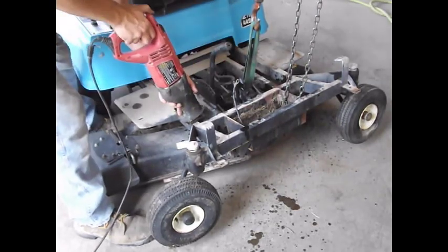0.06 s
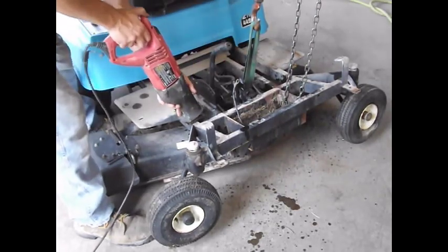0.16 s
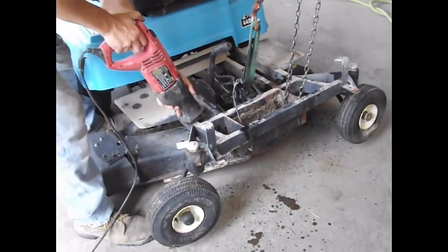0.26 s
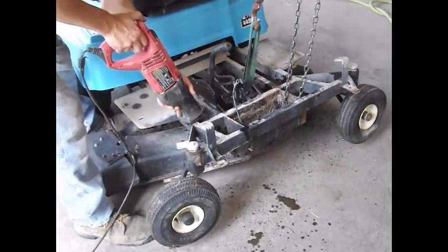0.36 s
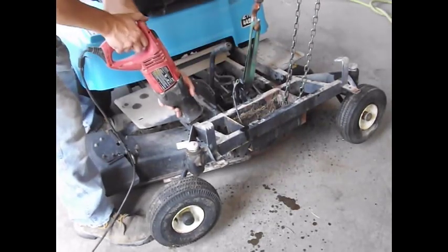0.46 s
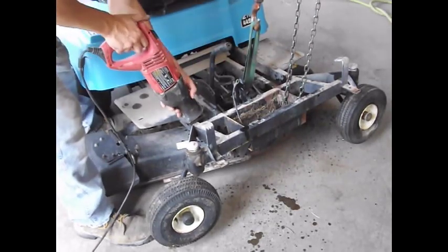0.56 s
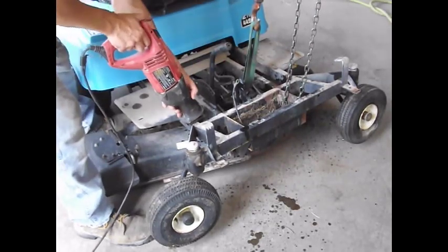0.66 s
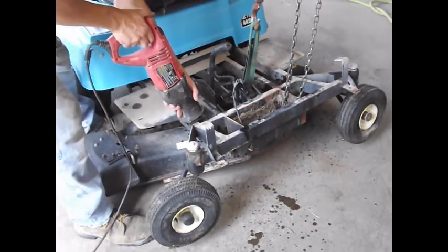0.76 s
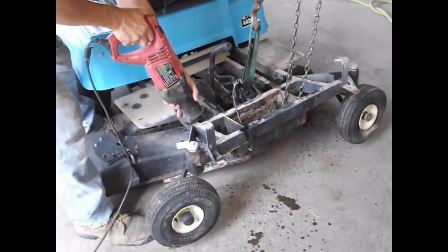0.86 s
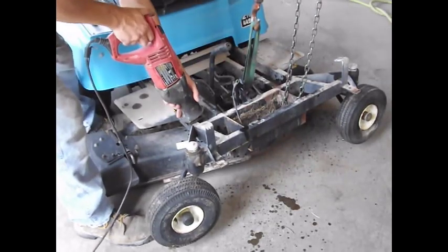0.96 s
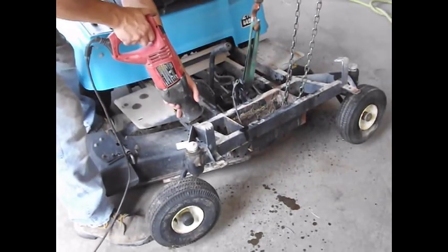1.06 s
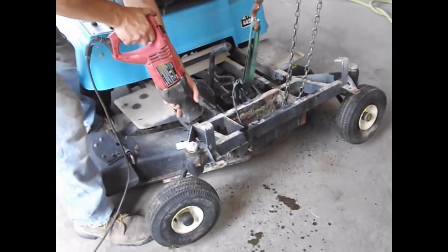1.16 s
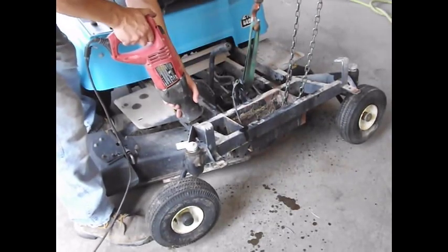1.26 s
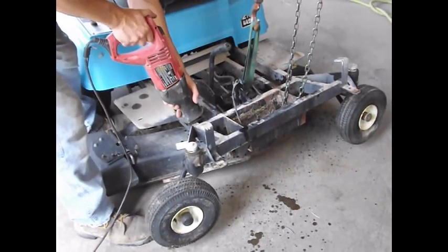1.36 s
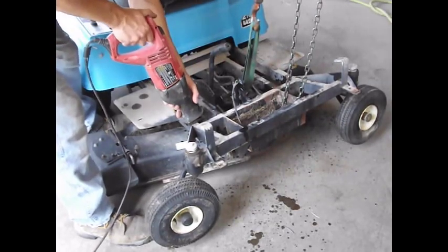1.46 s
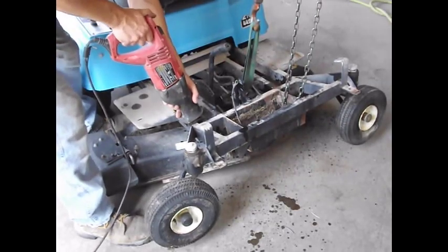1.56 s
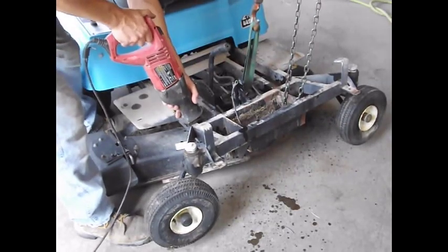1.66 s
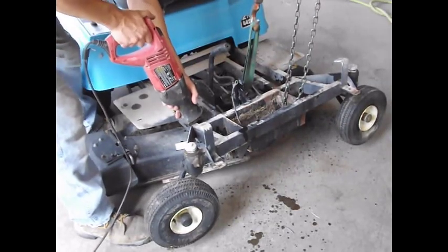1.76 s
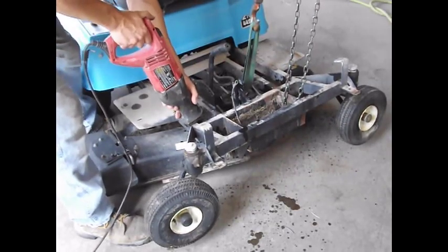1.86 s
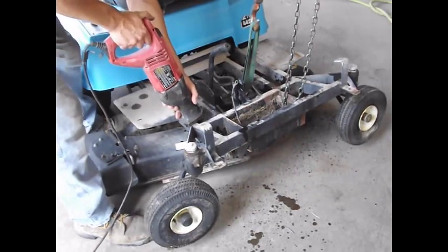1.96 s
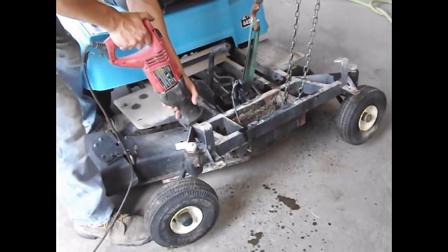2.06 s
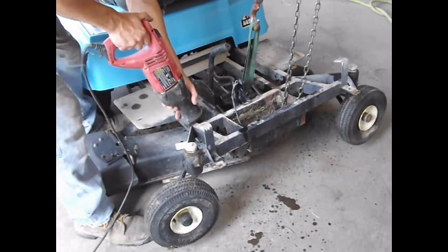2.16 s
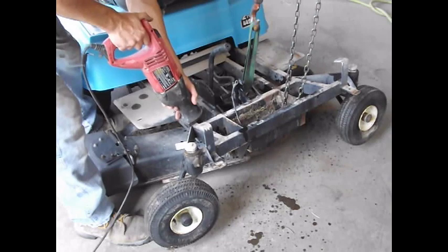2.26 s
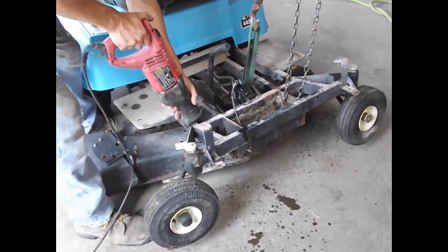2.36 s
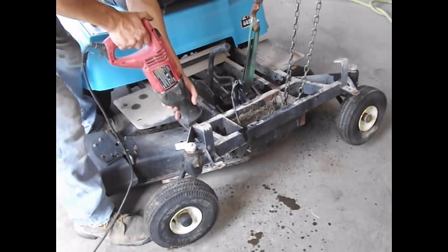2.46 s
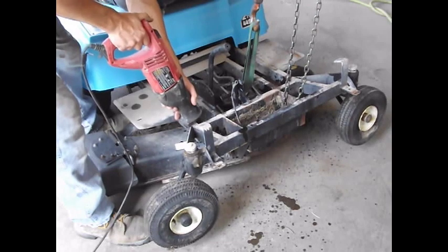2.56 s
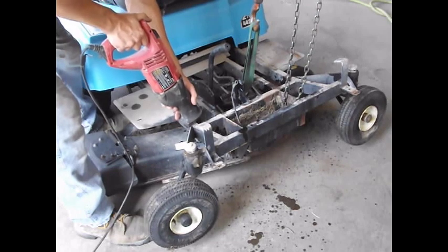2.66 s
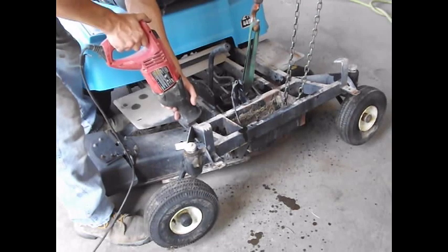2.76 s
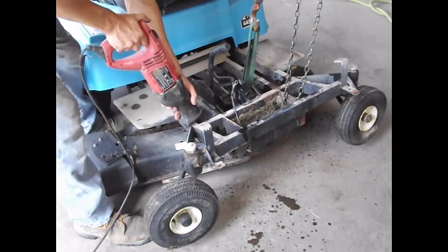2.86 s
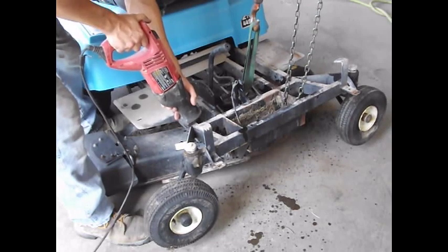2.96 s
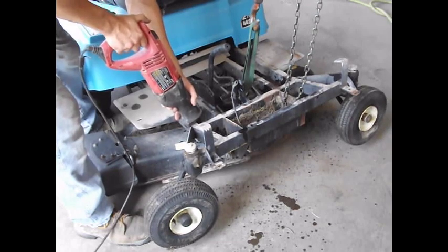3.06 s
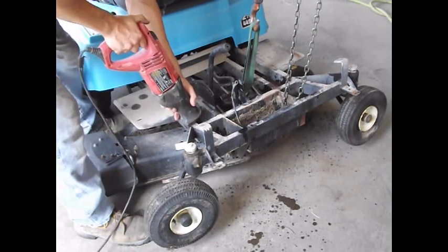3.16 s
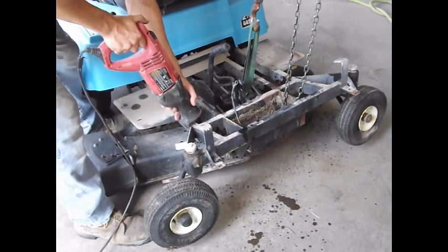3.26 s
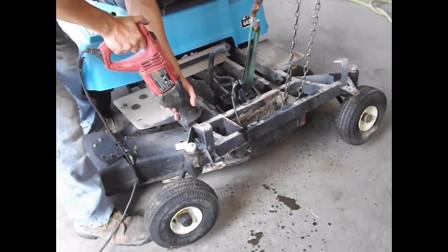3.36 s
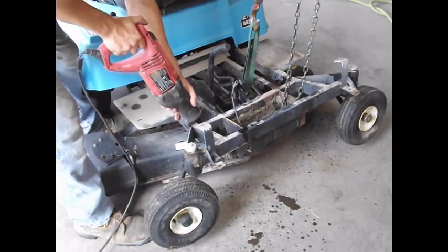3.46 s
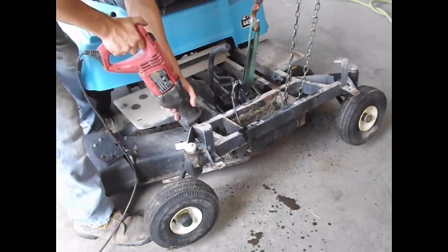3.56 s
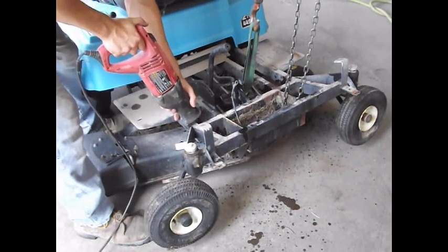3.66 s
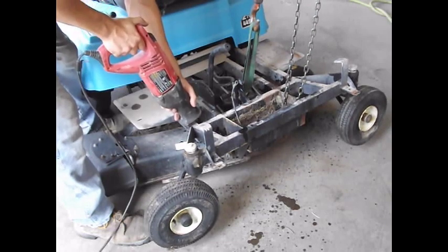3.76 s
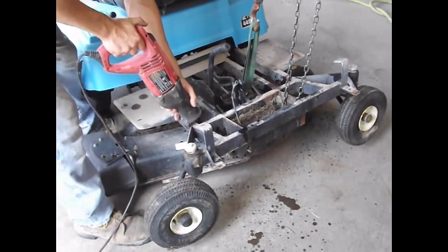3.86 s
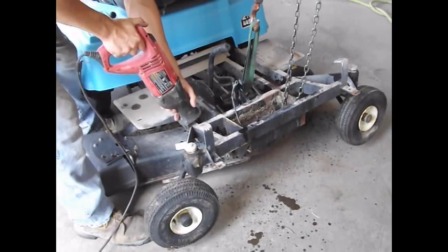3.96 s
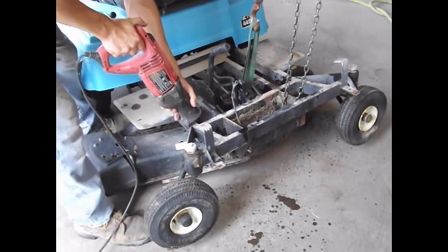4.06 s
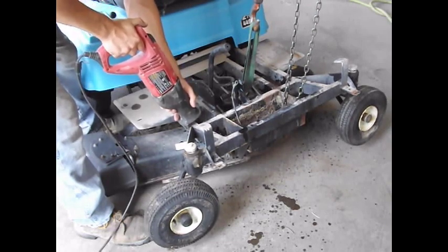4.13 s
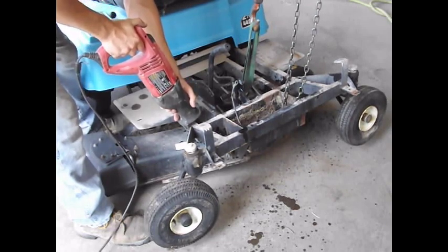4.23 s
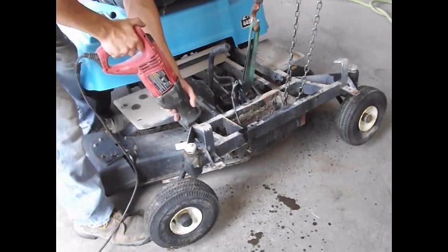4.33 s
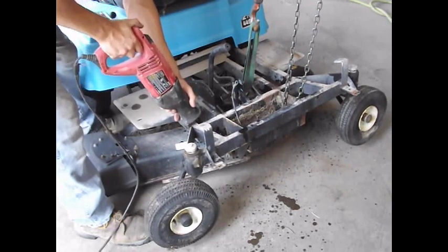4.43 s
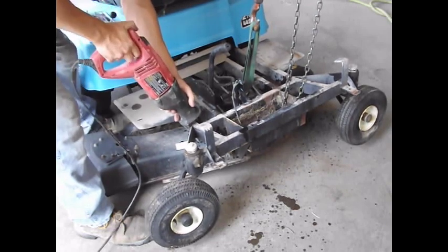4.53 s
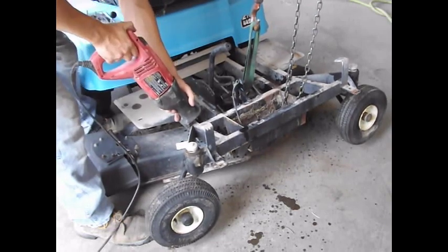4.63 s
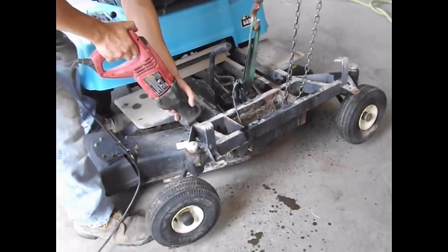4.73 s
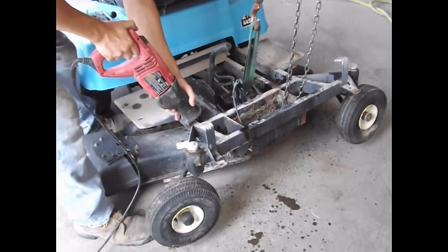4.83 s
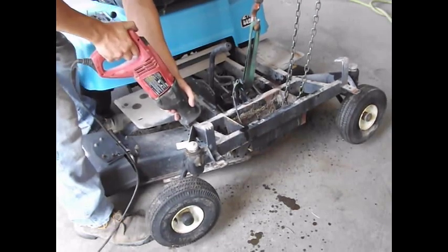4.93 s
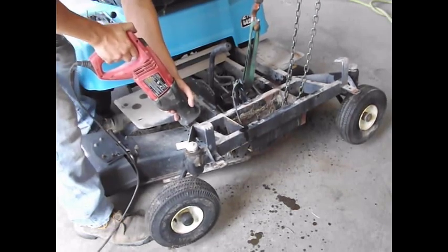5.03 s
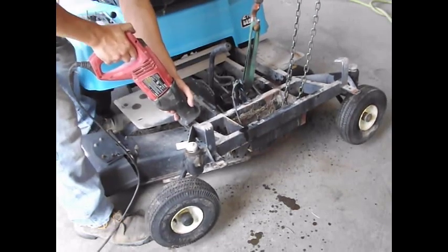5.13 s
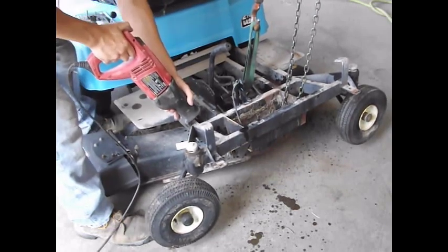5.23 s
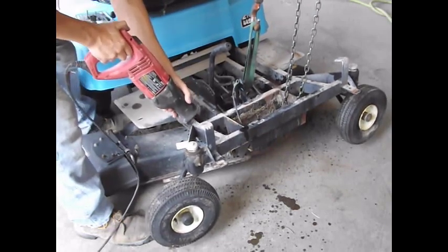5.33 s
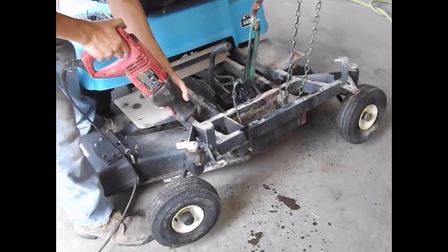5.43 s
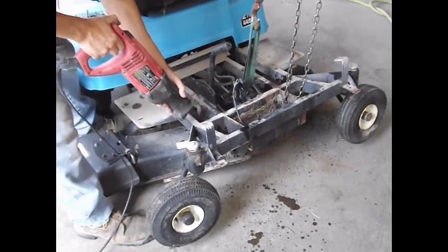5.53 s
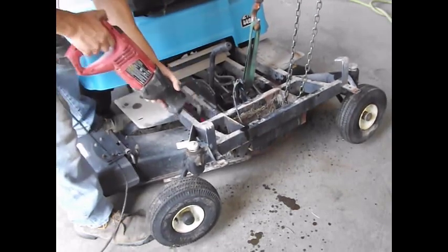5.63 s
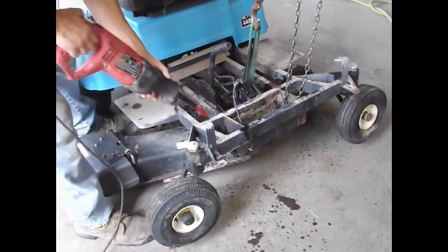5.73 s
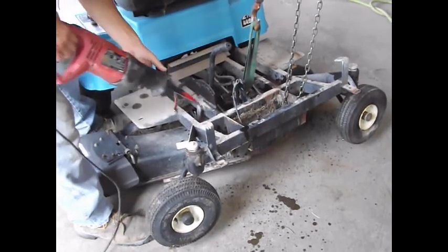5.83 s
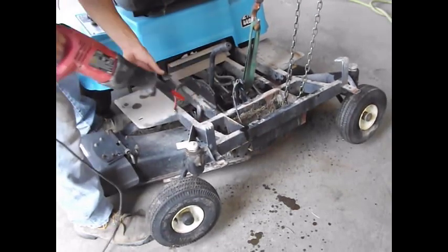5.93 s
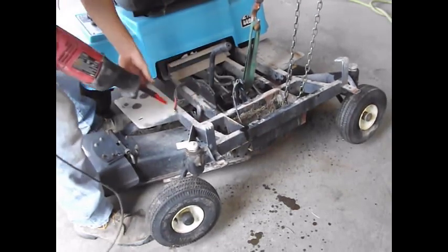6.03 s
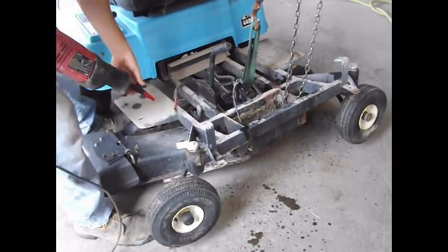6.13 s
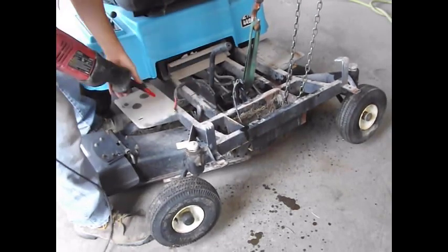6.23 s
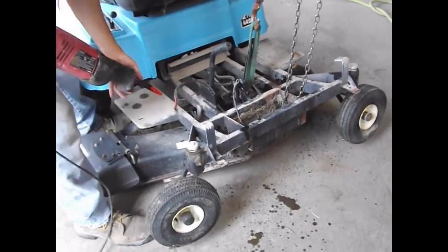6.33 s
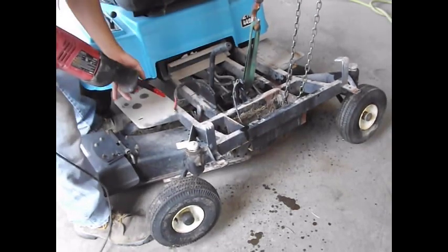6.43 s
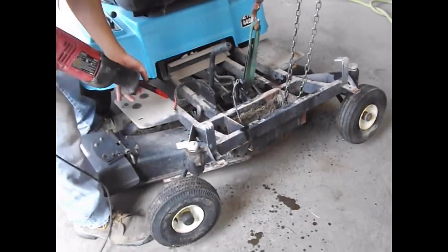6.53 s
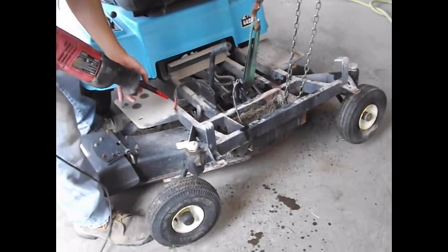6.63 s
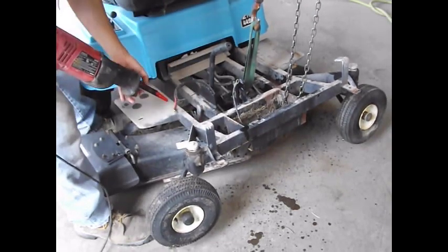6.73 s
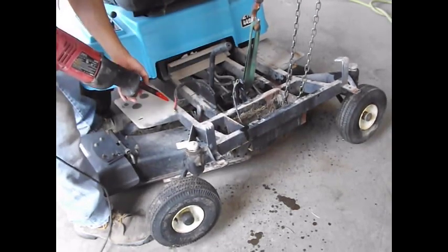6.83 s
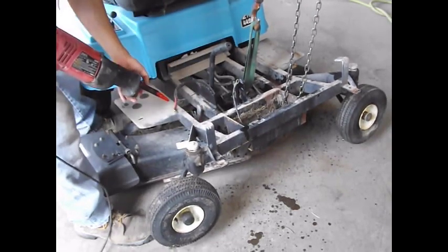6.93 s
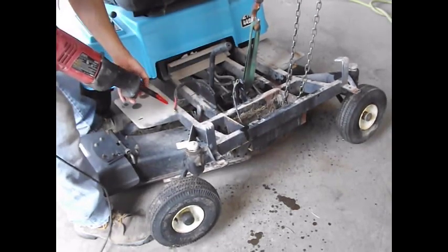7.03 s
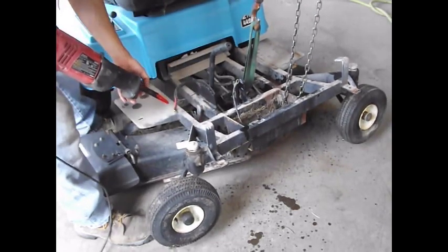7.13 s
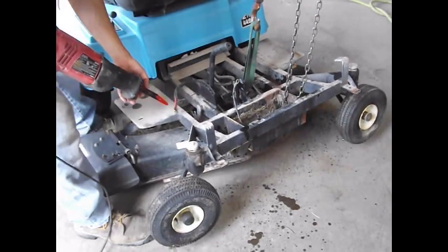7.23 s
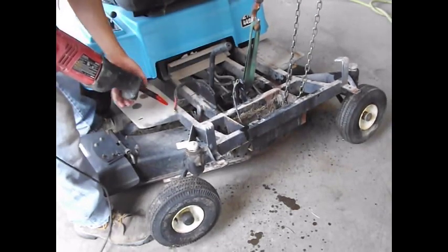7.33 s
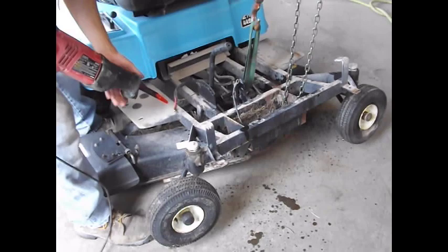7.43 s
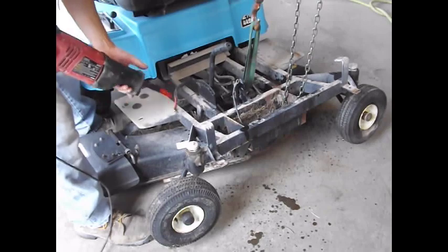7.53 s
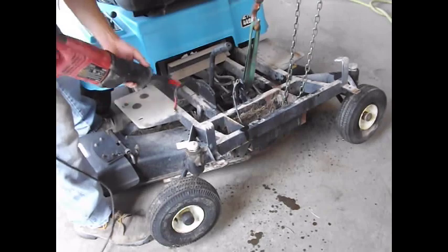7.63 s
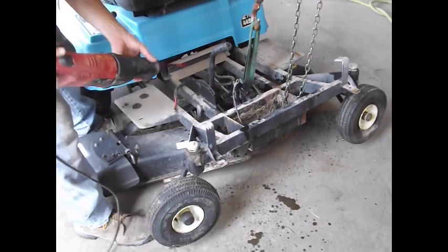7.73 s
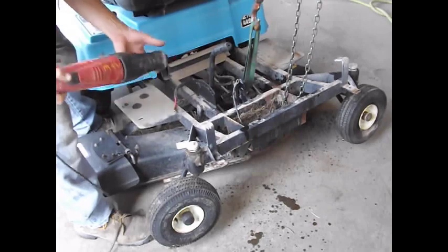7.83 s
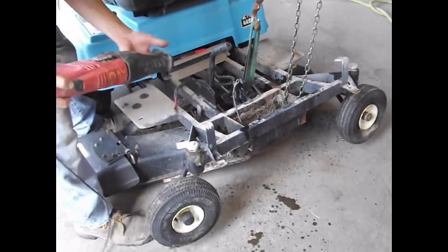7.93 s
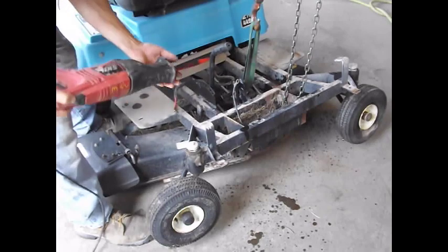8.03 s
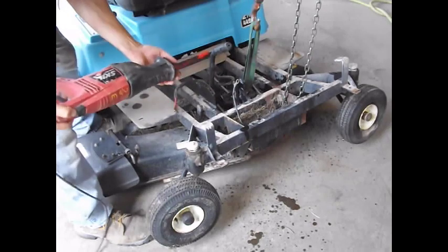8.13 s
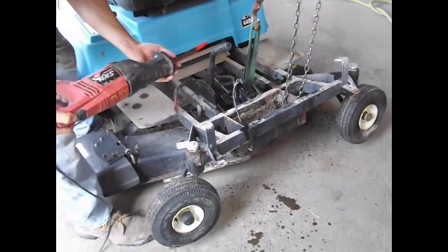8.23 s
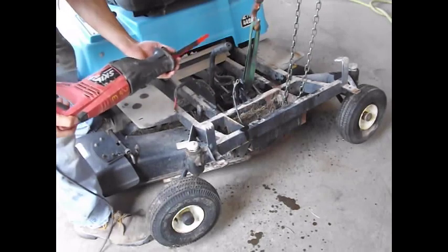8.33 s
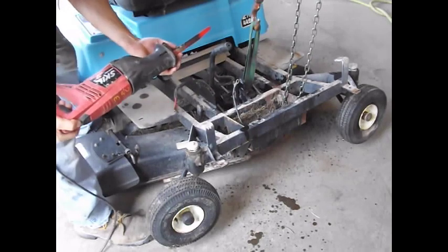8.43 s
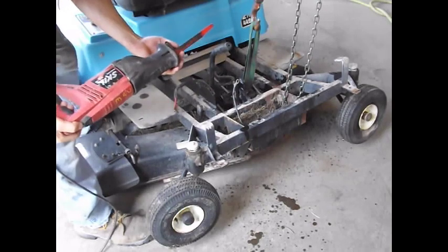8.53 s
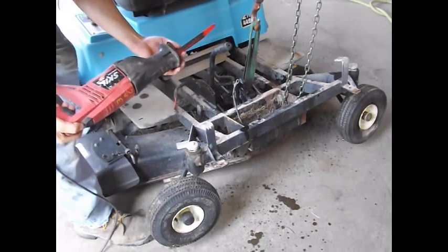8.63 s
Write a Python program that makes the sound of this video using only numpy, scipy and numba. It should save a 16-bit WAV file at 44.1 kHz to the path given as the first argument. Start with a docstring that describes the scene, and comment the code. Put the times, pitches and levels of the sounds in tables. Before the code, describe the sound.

A few soft knocks and a thin rising squeak come before a corded reciprocating saw bites into a steel frame. It revs up fast into loud, rattling, tearing rasp with gear whine and slamming metal, then slows to separate grinding strokes. Scattered knocks, one hard clank and a light blade clink follow. A small camera in a workshop squashes the loudness, over low air rumble and faint hiss.

```python
"""In a workshop, a corded reciprocating saw bites into a steel frame, runs up, cuts for three seconds and coasts down.
Teeth rasp as bursts of tiny impacts on every pass; the blade chatters in its slot and the frame rings in damped modes.
Gears whine at multiples of the blade rate. Knocks, and later clinks of the blade, are heard as the saw is handled.
Rumbling air and soft hiss lie beneath. A small camera with gain control and a low sample rate hears it all."""
import sys
import numpy as np
from scipy import signal
from scipy.fft import rfft, irfft
from scipy.io import wavfile
from scipy.ndimage import uniform_filter1d
from numba import njit

SR = 44100
rng = np.random.default_rng(int(sys.argv[2]) if len(sys.argv) > 2 else 0)


def wav_record(signal):
    """Record a signal, one row per channel, as 16-bit PCM in the file named by sys.argv[1]."""
    frames = np.transpose(np.atleast_2d(signal))
    bounded = np.clip(frames, -1, 1)
    # unit amplitude maps onto the largest positive 16-bit level
    quanta = np.round(bounded * 32767).astype(np.int16)
    wavfile.write(sys.argv[1], SR, quanta)


N = 383229
TIME = np.arange(N) / SR  # [s]

# Spectra and sets of modes give relative levels: each response is scaled to unit energy.
# spectrum of air rumbling on the microphone: (frequency [Hz], level [dB])
RUMBLE_SPECTRUM = [(8, -13), (14, -2), (22, -7), (35, -22), (60, -21), (110, -28.5), (250, -35.5),
                   (600, -72)]
# spectrum of the soft hiss: (frequency [Hz], level [dB])
HISS_SPECTRUM = [(40, -1), (130, 4), (250, 10.5), (500, 6.5), (1000, 3), (1700, 4.5), (2400, 5.5),
                 (3050, 8), (3700, 2.5), (4500, 0.5), (5300, -3.5)]
# strength of the air on the microphone: (time [s], level [dB])
DRAUGHT_LEVEL = [(0.2, -29.5), (1.2, -32.5), (2.0, -35), (4.6, -31.5), (5.1, -14.5), (6.0, -33.5),
                 (7.4, -33.5), (8.69, -30)]
# the loose blade clinking in its clamp: (time [s], strength [dB])
CLINK_BLOWS = [(8.415, 0.5), (8.433, -9), (8.446, -6.5)]
# ring of the free blade: (frequency [Hz], width [Hz], level [dB])
FREE_BLADE_MODES = [(1857, 30, 6), (2480, 200, -2), (2660, 120, -10), (3047, 60, -4), (4000, 120, -3)]
# spectrum of the clamp's tick: (frequency [Hz], level [dB])
CLAMP_SPECTRUM = [(700, -24), (1500, -4.5), (1900, -7), (2600, -2), (3600, -8.5), (4300, -13), (5300, -21)]
# the saw knocking on the chassis: (time [s], strength [dB], thud relative to it [dB], brightness [dB])
KNOCK_BLOWS = [(0.163, -9.5, -2, 0), (0.211, -14.5, 0, -7), (0.262, -10.5, -7, -2.5), (0.571, -19, -20, 3),
               (0.594, -15, -20, 1), (1.283, -6, -30, 0.5), (5.613, -1, -7.5, -4), (5.686, -5.5, -23, 1.5),
               (5.711, -7, -22, 3.5), (6.025, -13, -28, 7.5), (6.049, -7, -14, -4), (6.132, -11.5, -26, 0),
               (6.406, -10, -24, -7), (6.421, -8, -27, 2.5), (6.615, -7.5, -33, 0.5),
               (6.773, -13, -28, -4.5), (6.944, -10.5, -28, -1.5), (7.121, -12, -27, -0.5),
               (7.878, -12.5, 0.5, -5), (7.944, -11, -23, 0), (7.961, 5.5, -13, 1), (7.977, -2, 3, 0),
               (8.013, -6.5, -1, 0), (8.062, -10.5, -5, 2), (8.67, -14, -25, -2)]
# spectrum of a knock's crack: (frequency [Hz], level [dB])
CRACK_SPECTRUM = [(300, -20.5), (800, -5), (1200, 3.5), (1700, 6), (2400, 4), (3000, 11), (3600, 2),
                  (4300, -2), (5300, -9)]
# spectrum of a knock's thud: (frequency [Hz], level [dB])
KNOCK_THUD_SPECTRUM = [(200, -20), (340, 9), (480, 3.5), (700, 7.5), (1100, 1), (1800, -48), (3000, -52)]
# ring of the chassis: (frequency [Hz], width [Hz], level [dB])
CHASSIS_MODES = [(683, 20, -4), (852, 9.7, -5), (1140, 18, 4), (1645, 20, -8), (2090, 22, -7.5),
                 (2402, 24, -1.5), (3280, 16, -10), (4016, 25, -5), (4170, 76, -3)]
# the blade scraping as it is set on the steel: (time [s], pitch [Hz], level [dB])
SQUEAK_PATH = [(.95, 2820, -65), (1.09, 2870, -40), (1.14, 3020, -41.5), (1.2, 3150, -43),
               (1.26, 3100, -36), (1.32, 3240, -55)]
# the blade snagging in the cut: (time [s], strength [dB], jolt to the frame [dB])
CATCH_BLOWS = [(1.3324, 16.5, 8.5), (1.347, 11, 10), (1.4083, 27, 16.5), (1.4501, 26.5, 11),
               (1.4717, 23.5, 8.5), (1.5368, 27.5, 14), (1.6668, 19.5, 10.5), (1.8628, 27, 10),
               (2.0106, 21, 16), (2.2127, 25, 3), (2.417, 29.5, 6), (2.6649, 32.5, 17.5), (2.9534, 28, 8.5),
               (3.1567, 30, 0), (3.275, 30, 6), (3.369, 27, 5), (3.401, 29, 4), (3.4476, 33.5, 10),
               (3.708, 29, 15), (3.7549, 29, 3), (3.8376, 31, 11.5), (3.98, 28, 1), (4.197, 28, 8),
               (4.8105, 27, 14), (5.088, 20, 15), (5.1062, 21, 18), (5.211, 16.5, -6), (5.467, 12, -9)]
# spectrum of the blade slapping the slot: (frequency [Hz], level [dB])
SLAP_SPECTRUM = [(200, -26), (450, -7), (700, -12), (1200, -8), (1800, -10), (2350, 3.5), (2900, 15),
                 (3300, -3.5), (3800, 0), (5300, -5.5)]
# ring of the blade held by the slot: (frequency [Hz], width [Hz], level [dB])
HELD_BLADE_MODES = [(2495, 78, -6), (2918, 270, -3.5)]
# wall modes of the steel tube: (frequency [Hz], width [Hz], level [dB])
WALL_MODES = [(1095, 15, -7), (1242, 14, -9), (1888, 12, -7), (2030, 22, -4), (2108, 20, -4),
              (2251, 18, -3), (2388, 18, -5), (2439, 28, -5), (2558, 24, -3), (2612, 24, -3), (2836, 30, 0),
              (2915, 30, -3), (2984, 24, 2), (3180, 30, -7)]
# bending modes of the frame: (frequency [Hz], width [Hz], level [dB])
BENDING_MODES = [(129, 9, -14), (209, 11, 1), (398, 22, -4), (432, 28, -4)]
# spectrum of the frame's thudding: (frequency [Hz], level [dB])
FRAME_THUD_SPECTRUM = [(100, -32), (125, -18), (170, -26), (280, -2.5), (345, -2.5), (420, 2.5), (520, -1),
                       (650, -10), (1000, -16), (2000, -46)]
# pressure of the blade on the cut: (time [s], rasp level at full speed [dB], shaking of the frame [dB])
CUT_PRESSURE = [(1.25, -25, -55), (1.32, -19.5, -33), (1.35, -0.5, -18), (1.55, -1, -17), (1.68, -4, -18),
                (2.2, -5.5, -18.5), (2.8, -1, -16), (4.35, -1.5, -15.5), (4.7, -4, -20.5),
                (4.95, -4, -15.5), (5.25, -1.5, -22.5), (5.47, -8, -29), (5.58, -16.5, -46),
                (5.95, -28, -75)]
# the blade binds briefly and tears harder: (middle [s], half length [s], rise of the rasp [dB])
BIND_EVENTS = [(1.417, 0.011, 9.5), (1.544, 0.014, 8), (1.973, 0.036, 4), (2.661, 0.036, 3.5),
               (4.492, 0.0096, 6), (4.804, 0.0083, 2), (4.935, .04, 6.5), (4.99, 0.01, 9.5),
               (5.095, 0.015, 11.5), (5.431, 0.017, 11)]
# spectrum of the teeth's rasp: (frequency [Hz], level [dB])
RASP_SPECTRUM = [(300, -33), (600, -15.5), (800, -13), (1100, -10.5), (1500, -9.5), (1900, -9.5),
                 (2300, -2), (2900, -5.5), (3300, -4), (3700, -12.5), (4500, -17.5), (5300, -23.5)]
# spectrum of a slow blade's dull grinding: (frequency [Hz], level [dB])
DRAG_SPECTRUM = [(110, -12.5), (250, -8.5), (600, -0.5), (1250, 3.5), (2000, 4), (2600, -16), (4500, -8)]

# the hiss [dB] swells once as the saw is swung round: middle [s], half length [s], rise [dB]
HISS_DB, SWELL_S, SWELL_WIDTH_S, SWELL_DB = -41.5, 7.8, 0.44, 3.5
# the trigger is half pressed, squeezed fully and let go [s]
START_S, SQUEEZE_S, RELEASE_S = 1.25, 1.55, 4.3
# passes of the blade per second; a pull and a push make one turn of the crank
CREEP_HZ, FULL_HZ, LOADED_HZ = 15, 49.2, 44.6
# time constants of the motor, and the stretch in which the deepening cut loads it down [s]
SPIN_UP_S, COAST_S, LOADING_S = .2, .85, (3.03, 3.82)
# the camera's gain control, and the edge of its output filter
THRESHOLD_DB, RATIO, ATTACK_S, RECOVERY_S = -22, 2.596, 0.021, 0.16
TOP_HZ = 15800


def undb(db):
    """A level in decibels is twenty times the logarithm of the amplitude ratio."""
    return 10 ** (np.asarray(db) / 20)


def unit(x):
    """Dividing by the root mean square gives a signal unit effective amplitude."""
    return x / np.sqrt(np.mean(x ** 2))


def curves(table):
    """Linear interpolation in time joins the entries of each column."""
    s, *columns = np.transpose(table)
    return [np.interp(TIME, s, column) for column in columns]


def through(x, response):
    """A linear system's output is the convolution of its input with its impulse response."""
    return signal.fftconvolve(x, response)[:N]


def colour(points, size=8192):
    """Minimum phase: folding the cepstrum gives a causal, unit-energy response of the given spectrum."""
    hz, db = np.transpose(points)
    grid = np.maximum(np.fft.rfftfreq(size, 1 / SR), 1)
    octaves_above = np.maximum(np.log2(grid / hz[-1]), 0)
    octaves_below = np.maximum(np.log2(hz[0] / grid), 0)
    # outside the table the level falls 20 dB per octave
    level_db = np.interp(np.log(grid), np.log(hz), db) - 20 * (octaves_above + octaves_below)
    cepstrum = irfft(np.log(undb(level_db)))
    cepstrum[1:size // 2] *= 2
    cepstrum[size // 2 + 1:] = 0
    response = irfft(np.exp(rfft(cepstrum)))
    return response / np.linalg.norm(response)


def ring(modes):
    """Modal superposition: damped sines of alternating sign add up to a unit-energy response."""
    t = TIME[:SR]
    response = np.zeros(SR)
    for k, (hz, width, db) in enumerate(modes):
        decay = np.exp(-np.pi * width * t)  # a wider resonance dies sooner
        response += (-1) ** k * undb(db) * np.sqrt(width) * decay * np.sin(2 * np.pi * hz * t)
    return response / np.linalg.norm(response)


def blows(times, db):
    """Impulsive excitation: each blow is a force lasting one sample."""
    force = np.zeros(N)
    index = np.clip(np.asarray(times) * SR, 0, N - 1).astype(int)
    np.add.at(force, index, undb(db))
    return force


def scatter(x, t60, wet_db):
    """Diffuse reverberation: a dense noise tail falls 60 dB in t60 seconds."""
    t = TIME[:SR]
    onset = np.minimum(t / .003, 1)
    tail = rng.standard_normal(SR) * undb(-60 * t / t60) * onset
    return x + undb(wet_db) * through(x, tail / np.linalg.norm(tail))


def walk(size):
    """Slow fluctuation: random levels held for size samples are smoothed by a moving average."""
    held = np.repeat(rng.standard_normal(N // size + 1), size)
    return unit(uniform_filter1d(held, size)[:N])


def grains(per_second, spread_db):
    """Random impact process: tiny impulses of either sign and uneven size arrive at a given rate."""
    hit = rng.random(N) < per_second / SR
    sign = rng.choice([-1, 1], N)
    return hit * sign * undb(spread_db * np.clip(rng.standard_normal(N), -2, 2))


def rebounds(force, t60, rattle_db, per_second=700):
    """Repeated contact: every blow is followed by a dying rattle of tiny random impacts."""
    dying = through(force, undb(-60 * TIME[:SR] / t60))
    return force + undb(rattle_db) * dying * grains(per_second, spread_db=2)


def background(waver_db=0.64, gust_db=1.5):
    """Shaped random noise: air rumbles on the microphone in small gusts over a soft hiss."""
    draught_db, = curves(DRAUGHT_LEVEL)
    hiss_db = HISS_DB + SWELL_DB * np.exp(-((TIME - SWELL_S) / SWELL_WIDTH_S) ** 2)
    rumble = unit(through(rng.standard_normal(N), colour(RUMBLE_SPECTRUM, size=32768)))
    hiss = through(rng.standard_normal(N), colour(HISS_SPECTRUM))
    gusts = rumble * undb(draught_db + gust_db * walk(size=5000))
    return gusts + hiss * undb(hiss_db + waver_db * walk(size=2000))


def afterring():
    """Light damping: the hardest knock leaves one steel part singing faintly for seconds."""
    start = max(KNOCK_BLOWS, key=lambda row: row[1])[0]
    age = np.maximum(TIME - start, 0)
    hz, db, t60 = 549, -46, 7
    return undb(db - 60 * age / t60) * np.sin(2 * np.pi * hz * age)


def clinks(ring_db=-3, tick_db=-2):
    """Impact on a loose part: the blade rattles in its clamp, which ticks while the blade rings."""
    force = rebounds(blows(*np.transpose(CLINK_BLOWS)), t60=0.068, rattle_db=-8.5)
    blade = through(force, ring(FREE_BLADE_MODES))
    tick = scatter(through(force, colour(CLAMP_SPECTRUM)), t60=0.016, wet_db=2.0)
    return undb(ring_db) * blade + undb(tick_db) * tick


def knocks(ring_db=-7):
    """Contact stiffness: the tool's rattling crack, brighter on bare metal, adds to a thud and a ring."""
    s, db, thud_db, bright_db = np.transpose(KNOCK_BLOWS)
    low_pass = signal.butter(3, 2700, fs=SR, output="sos")
    high_pass = signal.butter(3, 2700, "high", fs=SR, output="sos")
    dull_force = rebounds(blows(s, db - bright_db / 2), t60=0.098, rattle_db=-12)
    bright_force = rebounds(blows(s, db + bright_db), t60=.1, rattle_db=-14.5)
    force = signal.sosfilt(low_pass, dull_force) + signal.sosfilt(high_pass, bright_force)
    thud = through(blows(s, db + thud_db), colour(KNOCK_THUD_SPECTRUM))
    impact = scatter(through(force, colour(CRACK_SPECTRUM)) + thud, t60=.05, wet_db=2)
    return impact + undb(ring_db) * through(blows(s, db), ring(CHASSIS_MODES))


def squeak(width_hz=120):
    """Sliding friction: teeth on the edge give a thin note, mostly rising and roughened by slow noise."""
    hz, db = curves(SQUEAK_PATH)
    touching = (TIME > SQUEAK_PATH[0][0]) & (TIME < SQUEAK_PATH[-1][0])
    low_pass = signal.butter(2, width_hz, fs=SR, output="sos")
    grip = unit(signal.sosfilt(low_pass, rng.standard_normal(N)))
    return touching * undb(db) * grip * np.sin(2 * np.pi * np.cumsum(hz) / SR)


def slap():
    """Cascaded systems: the blade's strike on its slot swells for an instant, then rings briefly."""
    response = np.convolve(colour(SLAP_SPECTRUM)[:1500], ring(HELD_BLADE_MODES)[:1500])
    return response / np.linalg.norm(response)


def catches(ring_db=-10):
    """Impulsive excitation: the blade snags and slams against the steel, jolting the whole frame."""
    s, db, jolt_db = np.transpose(CATCH_BLOWS)
    force = blows(s, db)
    walls = undb(ring_db) * through(force, ring(WALL_MODES))
    jolt = scatter(through(blows(s, jolt_db), colour(FRAME_THUD_SPECTRUM)), t60=0.11, wet_db=-5.0)
    return scatter(through(force, slap()) + walls, t60=.04, wet_db=-8) + jolt


def blade_speed():
    """Exponential approach: the motor creeps, spins up, sags under load and coasts down (passes/s)."""
    spun = 1 - np.exp(-np.maximum(TIME - SQUEEZE_S, 0) / SPIN_UP_S)
    top = np.interp(TIME, LOADING_S, [FULL_HZ, LOADED_HZ])
    coasting = np.exp(-np.maximum(TIME - RELEASE_S, 0) / COAST_S)
    return (CREEP_HZ + (top - CREEP_HZ) * spun) * coasting


def gears(passes, speed, waver_db=3, slip=0.00073):
    """Periodic meshing: wavering tones at multiples of the blade rate fade steeply below top speed."""
    multiples, tone_db = [23, 46, 106], [-17, -12, -30]
    turn = 2 * np.pi * (passes + slip * walk(size=600))
    whine = np.zeros(N)
    for k, db in zip(multiples, tone_db):
        whine += undb(db + waver_db * walk(size=1500)) * np.sin(k * turn)
    return whine * (speed / speed.max()) ** 4


def saw(crank_db=0.8, uneven_db=1.8, chatter_db=-3.0, ring_db=-5, bend_db=0, thud_db=-1, sway_db=1.5, drag_db=-2):
    """Modulated impact noise: teeth tear the steel on every pass, exciting the blade and the frame."""
    speed = blade_speed()
    relative_speed = speed / FULL_HZ
    cut_db, frame_db = curves(CUT_PRESSURE)
    bind_db = sum(db * np.exp(-((TIME - s) / half) ** 2) for s, half, db in BIND_EVENTS)
    end = CUT_PRESSURE[-1][0]
    running = np.interp(TIME, [START_S, START_S + 0.054, end - .1, end], [0, 1, 1, 0])
    passes = np.cumsum(speed) / SR
    crank = np.pi * passes
    # the teeth bite in mid-pass and rest where the blade turns round
    pass_db = 3.6 * np.cos(2 * crank)
    # pull and push differ, and no two passes are alike; a fast blade bites more unevenly
    each_pass = rng.standard_normal(1000)[passes.astype(int)]
    bite_db = pass_db + crank_db * np.cos(crank - 1.2) + uneven_db * each_pass
    bite = undb(bite_db * relative_speed ** 0.44)
    push = running * undb(cut_db + bind_db) * relative_speed

    teeth = unit(grains(per_second=3500, spread_db=4.0) * bite ** 0.65)
    rasp = through(teeth * push, colour(RASP_SPECTRUM))
    contacts = unit(grains(per_second=190 * bite, spread_db=2.2) * bite)
    chatter = undb(chatter_db) * through(contacts * push, slap())
    wall_force = unit(grains(per_second=2200, spread_db=1.5) * bite) * push
    walls = undb(ring_db) * through(wall_force, ring(WALL_MODES))
    # a slow blade drags and grinds with a duller sound
    drag_force = unit(grains(per_second=1500, spread_db=5.5) * bite) * push * (1 - relative_speed)
    drag = undb(drag_db) * through(drag_force, colour(DRAG_SPECTRUM))

    # once a turn the pull shakes the whole frame, which thuds and bends
    sway = undb(sway_db * np.cos(crank - 2.1) + uneven_db * each_pass)
    shake = running * undb(frame_db)
    thuds = unit(grains(per_second=900, spread_db=4.5) * sway) * shake
    flexes = unit(grains(per_second=900, spread_db=4.5) * sway) * shake
    frame = undb(thud_db) * through(thuds, colour(FRAME_THUD_SPECTRUM))
    frame += undb(bend_db) * through(flexes, ring(BENDING_MODES))
    return rasp + chatter + walls + drag + frame + gears(passes, speed) * running


def scene():
    """Superposition: cutting and handling reverberate in the workshop over the background."""
    cutting = scatter(saw() + catches(), t60=0.47, wet_db=-7.5)
    handling = scatter(knocks() + clinks() + squeak(), t60=0.64, wet_db=-6)
    return (cutting + handling + afterring() + background())[None]


@njit
def follow(x, attack, release):
    """First-order smoothing: the envelope rises and falls at different rates."""
    out, e = np.empty(len(x)), 0.
    for i in range(len(x)):
        e += (x[i] - e) * (attack if x[i] > e else release)
        out[i] = e
    return out


def gain_control(x):
    """Dynamic compression: gain falls while the sound is loud, so the background ducks under the saw."""
    envelope = follow(np.abs(x[0]), 1 / (ATTACK_S * SR), 1 / (RECOVERY_S * SR))
    excess = np.maximum(envelope / undb(THRESHOLD_DB), 1)
    return x * excess ** (1 / RATIO - 1)


def record(dry):
    """Sampling and imaging: a gain-ridden quarter-rate signal clips; a soft filter passes mirrored treble."""
    narrow = signal.firwin(201, 5400, fs=SR)
    coarse = signal.resample_poly(gain_control(dry), 1, 4, axis=1, window=narrow)
    soft = signal.firwin(45, SR / 8, window=("kaiser", 5.8), fs=SR)
    smooth = signal.resample_poly(np.clip(coarse, -1, 1), 4, 1, axis=1, window=soft)
    output_filter = signal.ellip(8, .2, 70, TOP_HZ, fs=SR, output="sos")
    return signal.sosfilt(output_filter, np.clip(smooth[:, :N], -1, 1))


dry = scene()
out = record(dry)
wav_record(out)
```